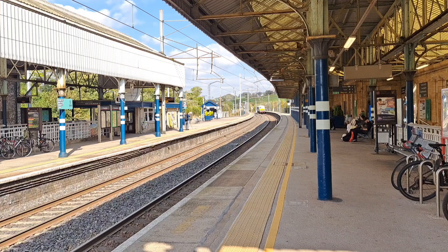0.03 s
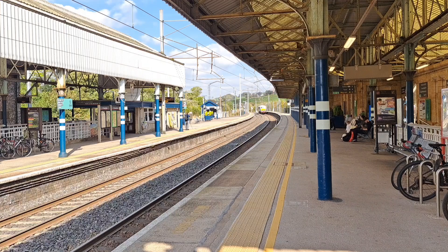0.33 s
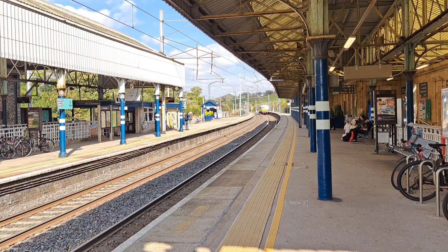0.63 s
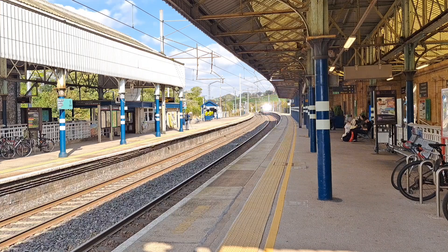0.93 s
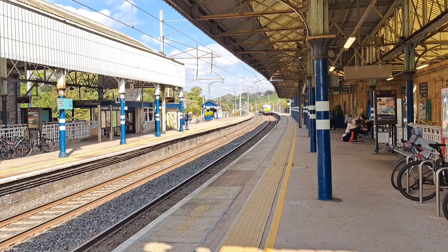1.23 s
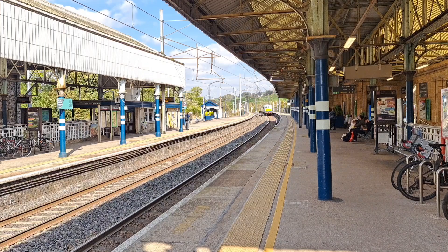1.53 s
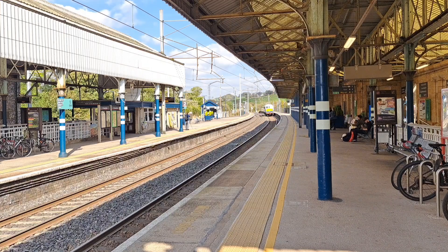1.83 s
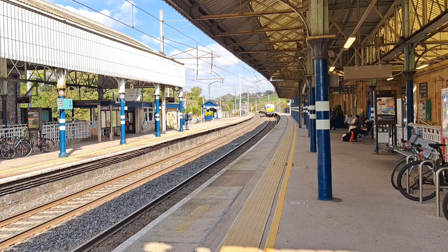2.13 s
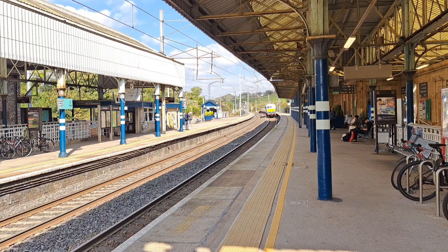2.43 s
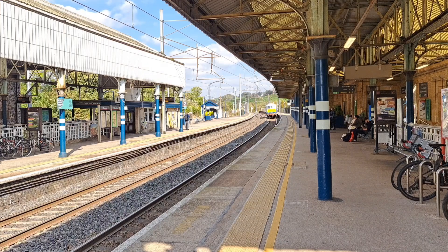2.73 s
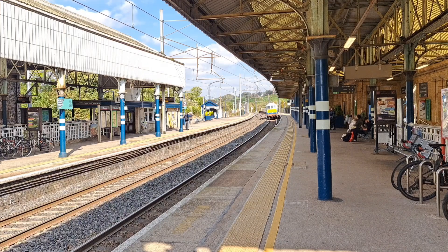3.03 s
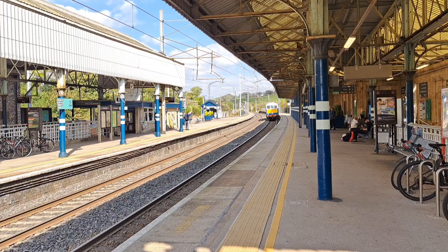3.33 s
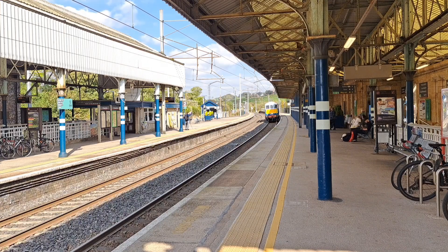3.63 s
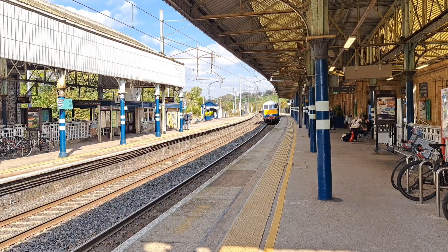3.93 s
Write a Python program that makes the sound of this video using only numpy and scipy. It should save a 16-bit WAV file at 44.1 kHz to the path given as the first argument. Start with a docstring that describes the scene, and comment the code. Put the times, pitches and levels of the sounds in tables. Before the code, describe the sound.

A distant train approaches a quiet, roofed platform, the rails singing with a metallic ring that slowly grows throughout. A few faint ticks sound nearby, the clearest at about 1 second. Very high wheel hiss comes in lightly echoing surges, strongest between 2 and 3 seconds. A low rumble enters around 2 seconds, and the rolling noise keeps swelling, loudest at 4 seconds.

```python
"""A train rounds a distant curve towards a quiet, roofed station platform.
Its wheels drive the rails, which sing ahead of it in many narrow resonances
while rolling noise and rumble grow. Flanges rub the curve and send surges of very high hiss
along the steel, echoed by the canopy. A few faint ticks sound nearby over steady station air."""
import sys
import numpy as np
from scipy import signal
from scipy.fft import rfft, irfft
from scipy.io import wavfile

SR = 44100
rng = np.random.default_rng(int(sys.argv[2]) if len(sys.argv) > 2 else 0)


def unload_audio(sound):
    """Save the sound as a 16-bit wav file, at the path given as the first command line argument."""
    columns = np.transpose(np.atleast_2d(sound))
    # keep every value between -1 and 1, then stretch to whole-number steps
    steps = np.round(np.clip(columns, -1, 1) * 32767)
    wavfile.write(sys.argv[1], SR, steps.astype(np.int16))


N = 176400
TIME_S = np.arange(N) / SR
HZ = np.maximum(np.fft.rfftfreq(N, 1 / SR), 1)


def from_db(db):
    """Decibels to gain."""
    return 10 ** (np.asarray(db) / 20)


def envelope(rows):
    """Gain over time from rows of time_s, gain_db."""
    return from_db(np.interp(TIME_S, *np.transpose(rows)))


def at_hz(rows):
    """Rows of freq_hz, value, interpolated over log frequency."""
    hz, value = np.transpose(rows)
    return np.interp(np.log(HZ), np.log(hz), value)


def colour(rows):
    """Gain over frequency, falling 24 dB per octave outside the table."""
    skirts = np.minimum(HZ / rows[0][0], 1) * np.minimum(rows[-1][0] / HZ, 1)
    return from_db(at_hz(rows)) * skirts ** 4


def resonances(modes, half_width_hz):
    """Gain over frequency of narrow modes with steep skirts."""
    peaks = (from_db(db) / (1 + ((HZ - hz) / half_width_hz) ** 2) for hz, db in modes)
    return np.sqrt(sum(peak ** 2 for peak in peaks))


def steel_modes(spacing_hz, depth_db):
    """Gain over frequency of many weak steel modes at random pitches."""
    grid_hz = np.arange(0, SR / 2, spacing_hz)
    heights = rng.uniform(-1.22, 1, len(HZ))[:len(grid_hz)]
    return from_db(depth_db * np.interp(HZ, grid_hz, heights))


def noise(gain, direct_share=0.22, band_hz=130):
    """Coloured stereo noise, rms 1, alike in the bass; fixed paths bring each band to one ear first."""
    # left-right likeness: freq_hz, correlation
    likeness = [(70, .985), (170, .95), (270, .85), (450, .6), (740, .08), (1220, -.3), (2200, .05),
                (6000, -.05)]
    # balance: freq_hz, left_minus_right_db
    lean = [(60, -1.8), (380, 0), (700, -3.5), (1300, -5), (2300, -0.5), (4400, -2), (8000, -1.5),
            (15000, 2.5)]
    mid, diffuse = rfft(rng.standard_normal((2, N)))
    phase_lead = 1j * rng.choice([-1, 1], len(HZ))[(HZ // band_hz).astype(int)]
    side = np.sqrt(direct_share) * phase_lead * mid + np.sqrt(1 - direct_share) * diffuse
    correlation = at_hz(likeness)
    signs = np.array([[1], [-1]])
    spectra = np.sqrt(1 + correlation) * mid + signs * np.sqrt(1 - correlation) * side
    stereo = irfft(spectra * gain * from_db(signs * at_hz(lean) / 2), N)
    return stereo / np.sqrt(np.mean(stereo ** 2))


def station_air(level_db=-44.5):
    """Steady, dark noise of the station."""
    # air spectrum: freq_hz, gain_db
    spectrum = [(40, 6), (100, -1.5), (200, 0), (400, -6), (1000, -11.5), (3000, -20), (6000, -30.5),
                (9000, -50), (16000, -44)]
    return from_db(level_db) * noise(colour(spectrum))


def ticks(gain_db=0.5, width_hz=860, rise_share=0.099, right_lead_db=7.5):
    """Platform ticks and scuffs: gritty bursts in one broad resonance; longer ones rise more slowly."""
    # ticks: start_s, level_db, pitch_hz, t60_s
    events = [(0.576, -48, 4000, 0.021), (0.605, -50.5, 8200, 0.061), (0.68, -50, 7600, 0.035),
              (0.9439, -31, 3860, .017), (1.414, -47, 8000, .05), (1.478, -46, 5000, .045),
              (2.068, -44, 4620, 0.027)]
    out = np.zeros((2, N))
    for start_s, level_db, pitch_hz, t60_s in events:
        grit = rng.standard_normal((2, N)) * rng.standard_normal(N)
        burst = signal.lfilter(*signal.iirpeak(pitch_hz, pitch_hz / width_hz, fs=SR), grit)
        age = np.clip(TIME_S - start_s, 0, 1) / t60_s
        shape = np.minimum(age / rise_share, 1) * np.exp(-np.log(1000) * age)
        out += from_db(level_db + gain_db) * shape * burst / burst.std()
    return out * from_db([[-right_lead_db / 2], [right_lead_db / 2]])


def flanges(echo_delay_s=0.015, echo_t60_s=0.34):
    """Flanges rub the curve: swells of high hiss on the left, a canopy echo more to the right."""
    # Gaussian swells: centre_s, half_length_s, level_db
    rubs = [(0.01, 0.069, -55), (0.204, 0.056, -44.5), (0.484, .025, -51), (1.132, 0.021, -43),
            (1.176, 0.038, -46), (1.327, 0.13, -40.5), (1.482, 0.071, -44), (1.613, 0.061, -45),
            (1.782, 0.024, -41.5), (1.997, 0.14, -37), (2.242, 0.11, -35), (2.574, 0.057, -30.5),
            (2.876, 0.031, -35.5)]
    # hiss spectrum: freq_hz, gain_db
    spectrum = [(6000, -46), (6400, -6), (6700, -13.5), (7200, -28), (8700, -28), (10200, -12.5),
                (11400, -10), (12400, 0.5), (13400, 2.5), (14300, -2), (15700, 0)]
    power = sum(from_db(level_db) ** 2 * np.exp(-2 * ((TIME_S - centre_s) / half_s) ** 2)
                for centre_s, half_s, level_db in rubs)
    delayed_power = np.interp(TIME_S - echo_delay_s, TIME_S, power)
    decay = from_db(-60 / (echo_t60_s * SR)) ** 2
    echo_power = signal.lfilter([1 - decay], [1, -decay], delayed_power)
    steel = colour(spectrum) * steel_modes(spacing_hz=28.8, depth_db=8)
    direct = from_db([[1], [-11]]) * np.sqrt(power) * noise(steel)
    echo = from_db([[-4.5], [-1.5]]) * np.sqrt(echo_power) * noise(steel)
    return direct + echo


def rolling(roar_db=-28.5, wheels_db=-35):
    """Airborne rolling noise and wheel tones grow as the train nears."""
    # approach: time_s, gain_db
    nearness = [(1.0, -17.3), (1.9, -9), (2.5, -6.5), (3.1, -2.5), (3.6, -0.35), (4, 3.5)]
    # rolling spectrum: freq_hz, gain_db
    spectrum = [(80, -17), (150, -4.5), (260, -1), (380, -2), (520, 11), (900, -6.5), (1400, -4.5),
                (2100, -3.5), (2500, -17), (3300, -20), (5000, -27), (6000, -32.5), (8000, -33.5),
                (9200, -42), (16000, -46)]
    # wheel resonances: pitch_hz, gain_db
    modes = [(473, -1.5), (1544, -7.5), (2068, -2.5)]
    roar = from_db(roar_db) * noise(colour(spectrum))
    wheels = from_db(wheels_db) * noise(resonances(modes, half_width_hz=4.5))
    return envelope(nearness) * (roar + wheels)


def rumble():
    """The train's low rumble, with a drone swelling and ebbing above it."""
    # envelopes: time_s, level_db
    rumble_level = [(1.95, -48), (2.15, -39), (2.5, -40.5), (3.0, -42), (4, -40)]
    drone_level = [(1.0, -63), (1.35, -46.5), (1.7, -57), (2.15, -46), (2.6, -48), (2.9, -59), (3.6, -48.5),
                   (4, -42)]
    # spectra: freq_hz, gain_db
    rumble_spectrum = [(20, -25), (33, -18), (45, -4.5), (55, -3.5), (70, -1), (84, -14.5), (115, -25)]
    drone_spectrum = [(125, -4), (150, 2), (200, -5)]
    bass = envelope(rumble_level) * noise(colour(rumble_spectrum))
    drone = envelope(drone_level) * noise(colour(drone_spectrum))
    return bass + drone


def rail_song(modes_db=-1.5, knee_hz=630, reference_drive_db=-29.5):
    """Wheel roughness shakes the rails' pass bands and modes; harder drive favours the low ones."""
    # wheel drive: time_s, level_db
    drive_level = [(0, -34.5), (.3, -32), (.6, -33), (.76, -29.2), (1.15, -29.5), (1.3, -31), (1.48, -28.5),
                   (1.9, -29), (2.62, -27), (2.69, -24.5), (2.83, -24), (2.96, -26.5), (3.3, -24.5),
                   (3.5, -25.5), (3.74, -24.5), (4, -26)]
    # rail pass bands: freq_hz, gain_db
    spectrum = [(300, -45), (430, -30), (520, -7), (720, -0.5), (930, -2), (1150, -9), (1300, -15),
                (1400, -20.5), (1700, -16.5), (1790, -13.5), (1920, -13.5), (2060, -11), (2130, -32),
                (2600, -28), (4000, -61)]
    # rail resonances: pitch_hz, gain_db
    modes = [(530, -5.5), (566, -1), (598, -6.5), (638, -10), (664, -1.5), (704, 1.5), (761, 0.5),
             (843, -8), (900, -7.5), (927, -1.5), (1053, -5.5), (1138, -8), (1281, -8), (1765, -13),
             (1865, -14), (1986, -11.5), (2025, -14)]
    bands = noise(colour(spectrum) * steel_modes(spacing_hz=8, depth_db=4))
    song = bands + from_db(modes_db) * noise(resonances(modes, half_width_hz=7.4))
    lows = irfft(rfft(song) / (1 + (HZ / knee_hz) ** 16), N)
    highs = song - lows
    drive = envelope(drive_level)
    low_gain = (drive / from_db(reference_drive_db)) ** 0.72
    return drive * (highs + low_gain * lows)


def rail_sizzle(gain_db=-3):
    """Thin, high sizzle from the rails' crowded modes."""
    # sizzle envelope: time_s, level_db
    swell = [(1.0, -57), (1.4, -54), (2.0, -56), (2.6, -45.5), (3.0, -51), (4, -47)]
    # sizzle spectrum: freq_hz, gain_db
    spectrum = [(6000, -30), (6350, 1.5), (6600, 0.5), (7100, -12), (9000, -20), (11300, -6), (11900, -2),
                (12550, 3.5), (13300, -2.5), (15800, -10.5)]
    steel = colour(spectrum) * steel_modes(spacing_hz=23.7, depth_db=7)
    return from_db(gain_db) * envelope(swell) * noise(steel)


def scene():
    """The approaching train and the station around the listener."""
    train = rail_song() + rail_sizzle() + rolling() + rumble() + flanges()
    return train + ticks() + station_air()


def record(dry, cutoff_hz=15780):
    """Steep elliptic low-pass."""
    return signal.sosfilt(signal.ellip(12, .1, 80, cutoff_hz, fs=SR, output="sos"), dry)


dry = scene()
out = record(dry)
unload_audio(out)
```